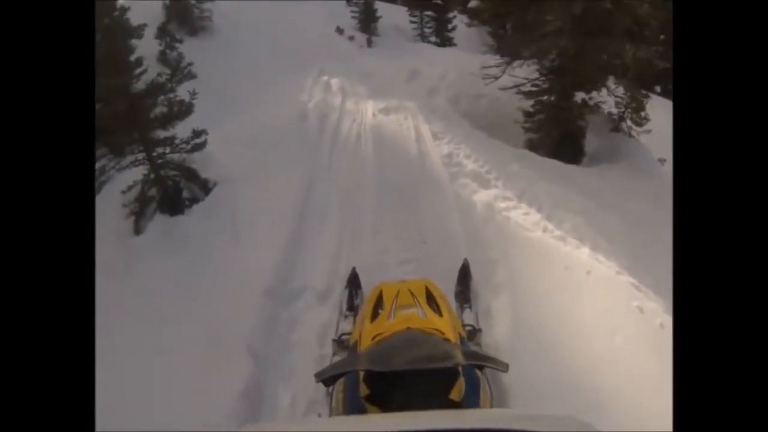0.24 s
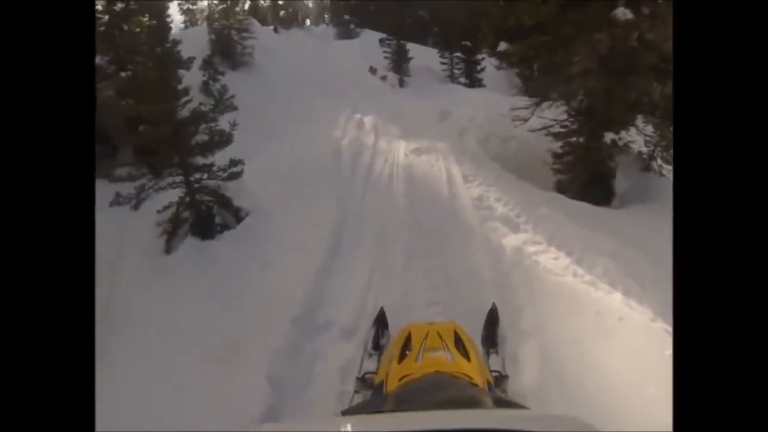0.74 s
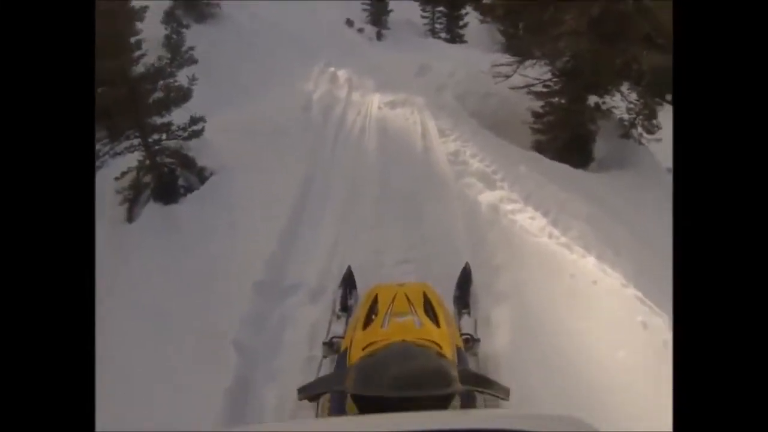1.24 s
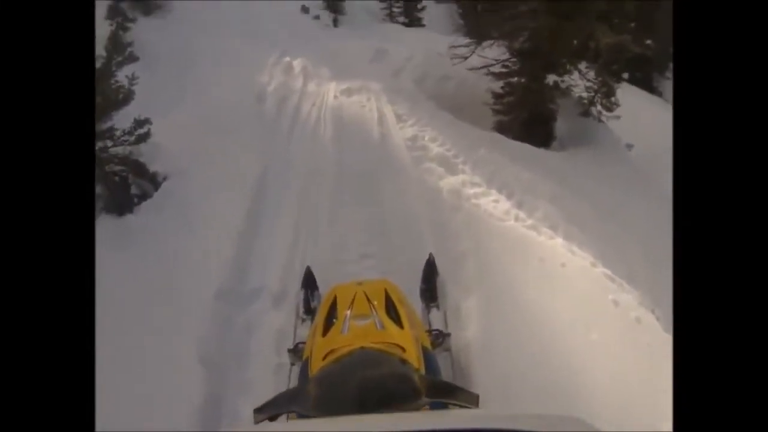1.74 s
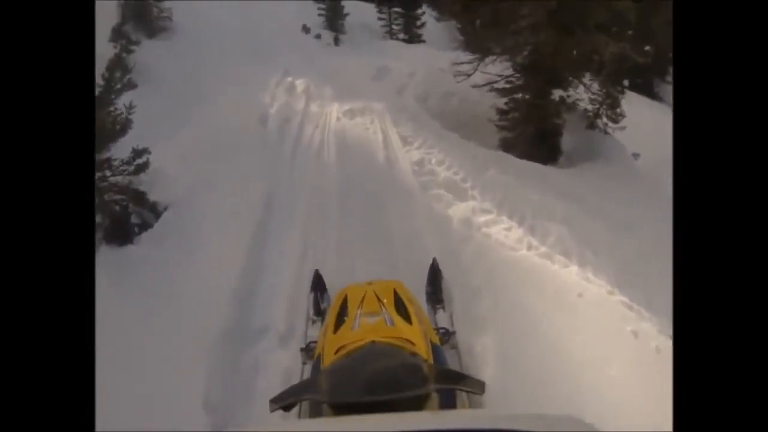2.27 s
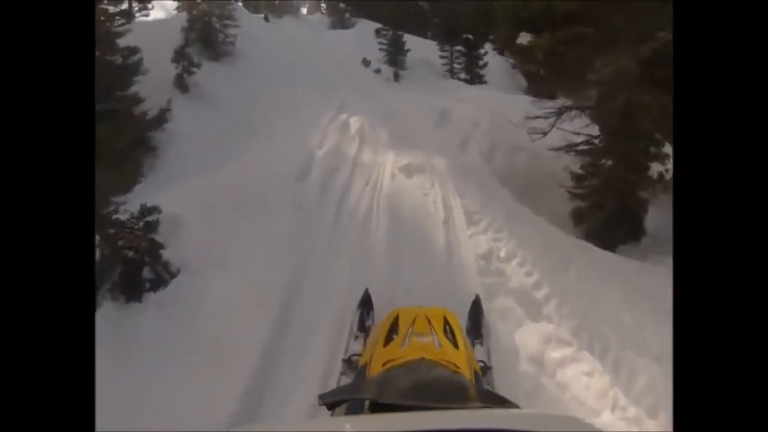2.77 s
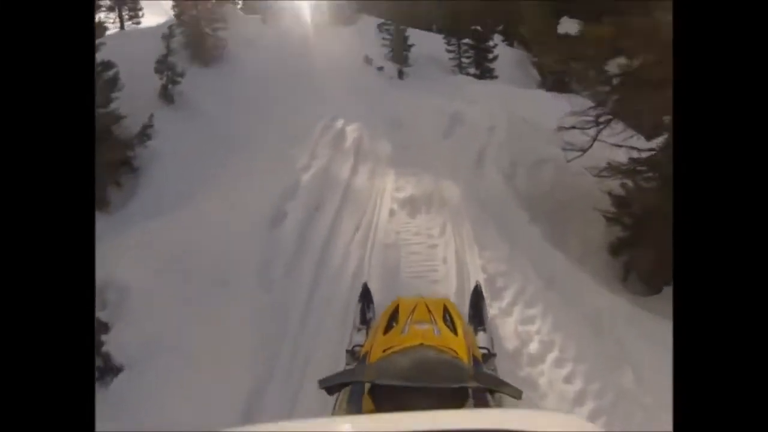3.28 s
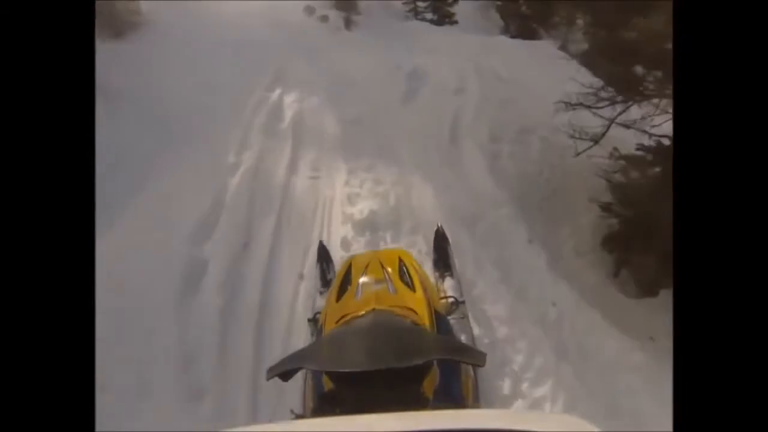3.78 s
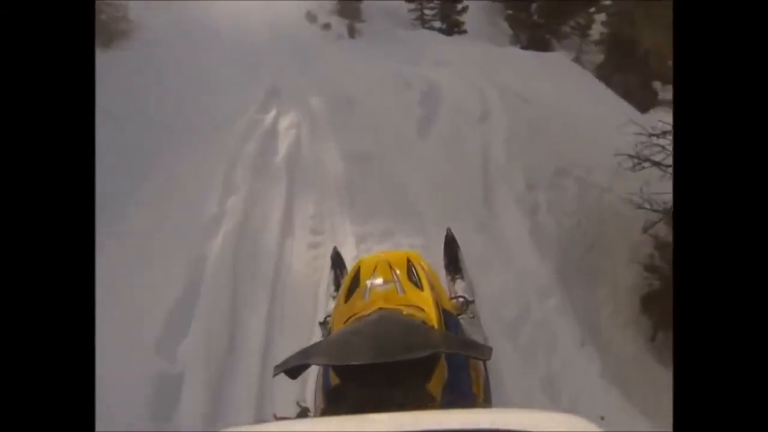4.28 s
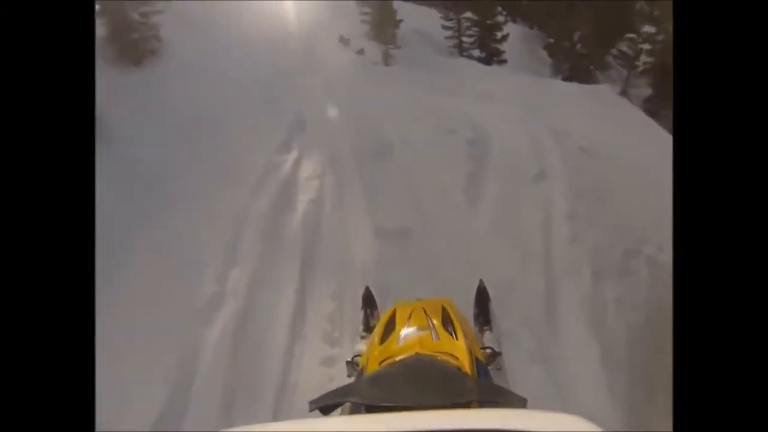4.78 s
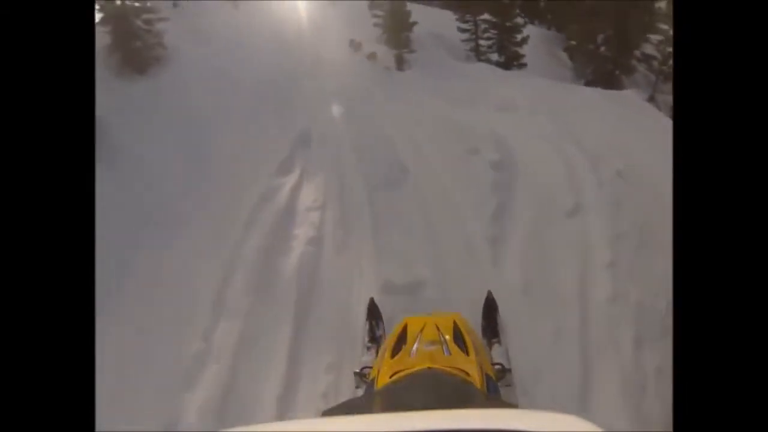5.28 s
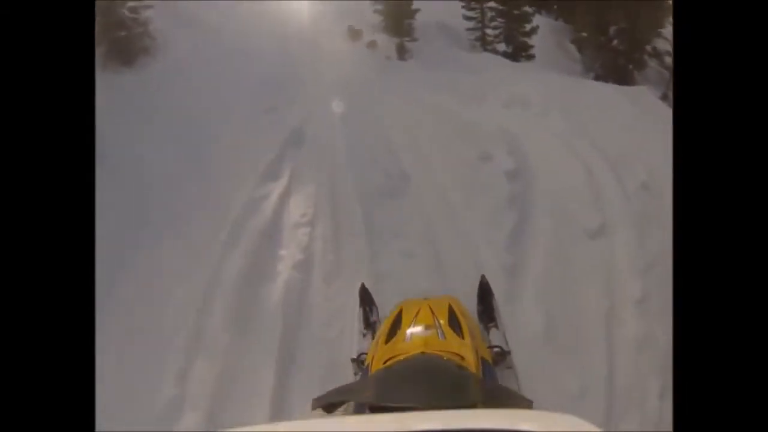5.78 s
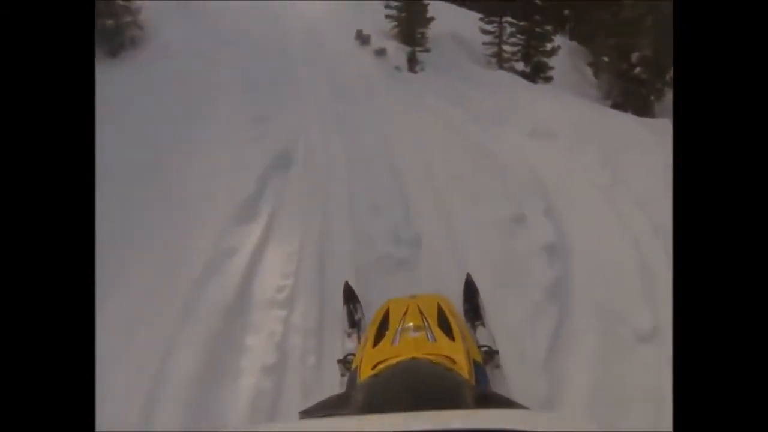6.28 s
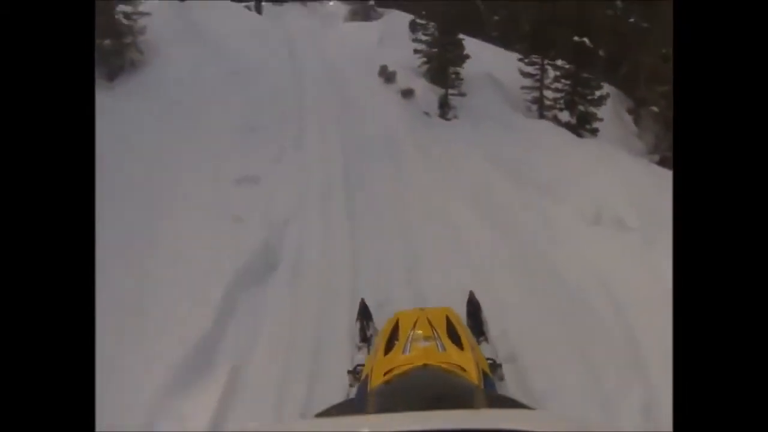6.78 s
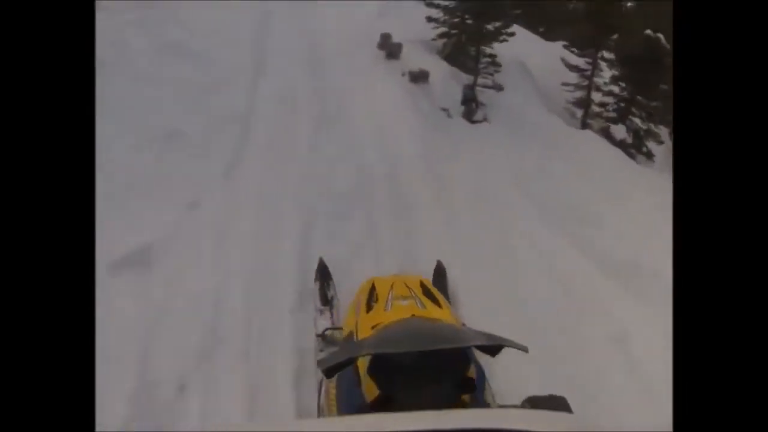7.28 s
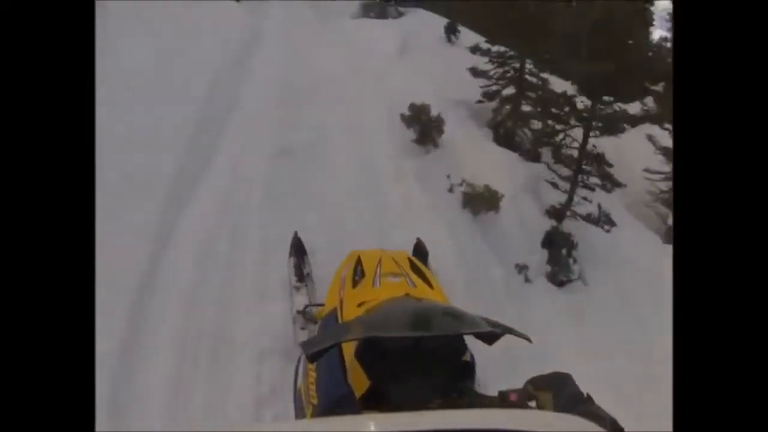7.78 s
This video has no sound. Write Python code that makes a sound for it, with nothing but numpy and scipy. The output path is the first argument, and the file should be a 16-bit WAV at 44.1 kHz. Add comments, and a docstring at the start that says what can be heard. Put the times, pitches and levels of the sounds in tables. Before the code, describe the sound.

A two-stroke snowmobile is heard very close, from the rider's position, on an open snowy slope without echo. From 0 to 1.5 seconds it idles low and lumpy beneath a soft fan hush, with brief cloth rustles. A sharp plastic click with a dull thud snaps at about 0.26, a softer knock comes at 0.45, and a quick metallic rattle at 0.62-0.67. At 1.5 the engine jumps up in two quick blips, then pulls in raspy bursts near 2.0, 2.4, 2.9, 3.4 and 4.0, sagging between them with stuttering misfires and low thumps. From 4.3 to 5.6 it holds a rough, sputtering drone. Throttle returns near 5.9, with a clear airbox howl around 6, then the pitch climbs steadily, reaching a loud, hard metallic buzz from 7.5 to the end at about 8, with track rumble and snow spray hiss.

```python
"""Snowmobile pulling away uphill

A two-stroke twin snowmobile, heard from the rider's helmet, idles while something on it is clicked and rattled.
It then pulls away up a snowy slope in bursts of throttle, misfires when the throttle closes, and winds up under load.
One train of firing pulses drives the exhaust, airbox and engine casing through filters, mixed with gas noise.
Shaped noise makes the fan, belt, track, snow spray and clothing; fading sine waves make the clicks and rattles.
"""
import sys
import numpy as np
from scipy import signal
from scipy.fft import rfft, irfft, next_fast_len
from scipy.io import wavfile
from scipy.ndimage import uniform_filter1d, map_coordinates

SR = 44100
rng = np.random.default_rng(int(sys.argv[2]) if len(sys.argv) > 2 else 0)


def generate_wav(signal):
    """Clip the signal to [-1, 1] and save it as 16-bit WAV at the path in sys.argv[1]."""
    frames = np.transpose(np.atleast_2d(signal))
    scaled = np.clip(frames, -1, 1) * 32767
    pcm = np.round(scaled).astype(np.int16)
    wavfile.write(sys.argv[1], SR, pcm)


N = 354108  # length in samples
FULL_HZ = 200  # the full firing rate, in firings a second


def amp(db):
    """Turn decibels into a gain."""
    return 10 ** (np.asarray(db) / 20)


def unit(x):
    """Scale x to an average (rms) level of 1."""
    return x / np.sqrt(np.mean(x ** 2) + 1e-20)


def steady(x, size=5000):
    """Hold x at rms 1 from moment to moment, keeping its fast flutter; size is in samples."""
    power = uniform_filter1d(uniform_filter1d(x ** 2, size), size)
    return x / np.sqrt(np.abs(power) + 1e-14)


def curves(rows, where=None):
    """Read every later column at places along the first column, by default at the time of every sample."""
    first, *columns = np.transpose(rows)
    if where is None:
        where = np.arange(N) / SR
    return [np.interp(where, first, column) for column in columns]


def wobble(rate):
    """Make a smooth random curve with rate random points a second."""
    positions = np.linspace(0, N * rate / SR, 4000)
    smooth = map_coordinates(rng.standard_normal(2000), [positions], mode="wrap")
    return np.interp(np.arange(N), np.linspace(0, N, 4000), smooth)


def swell(s, width):
    """Rise and fall in a bell shape: 1 at time s, about a third at width seconds either side."""
    return np.exp(-((np.arange(N) / SR - s) / width) ** 2)


def colour(x, points, size=16384):
    """Filter x to a (Hz, dB) shape, with a filter that never sounds ahead of its input."""
    hz, db = np.transpose(points)
    log_hz = np.log(np.fft.rfftfreq(size, 1 / SR) + 1)
    log_gain = np.log(amp(np.interp(log_hz, np.log(hz), db)))
    # folding the cepstrum moves all of the filter's response to after the input (minimum phase)
    cepstrum = irfft(log_gain)
    cepstrum[1:size // 2] *= 2
    cepstrum[size // 2 + 1:] = 0
    return signal.fftconvolve(x, irfft(np.exp(rfft(cepstrum))))[:N]


def filtered(x, response):
    """Multiply the spectrum of x by a function of frequency."""
    padded = next_fast_len(N + SR // 4)
    hz = np.fft.rfftfreq(padded, 1 / SR)
    return irfft(rfft(x, padded) * response(hz), padded)[:N]


def resonate(x, modes):
    """Pass x through (Hz, width Hz, dB) resonances whose skirts fall away quickly."""
    centre = np.mean([mode[0] for mode in modes])

    def response(f):
        peaks = 0
        for k, (hz, width, db) in enumerate(modes):
            # signs alternate from one resonance to the next
            peaks = peaks + (-1) ** k * amp(db) * 1j * f * width / (hz * hz - f * f + 1j * f * width)
        return peaks / (1 + ((f - centre) / (.4 * centre)) ** 4)

    return filtered(x, response)


def blend(tone, noise, tone_db):
    """Mix tone and noise in the given ratio, at rms 1."""
    return steady(amp(tone_db) * steady(tone) + steady(noise))


def pulses(times, sizes):
    """Make short impulses that may fall between samples, without false high tones."""
    at = times[:, None] * SR
    index = np.floor(at).astype(int) + np.arange(-7, 9)
    shape = np.sinc(index - at) * np.cos(np.pi * (index - at) / 16) ** 2
    index = np.clip(index, 0, N).ravel()
    return np.bincount(index, (shape * sizes[:, None]).ravel(), N + 1)[:N]


def crank():
    """Give firing rate and throttle: the engine winds up in each burst, sags in between, then climbs."""
    # Bursts of throttle. Each row: opens in seconds, closes in seconds, firing rate at opening in Hz,
    # firing rate at closing in Hz, throttle from 0 to 1.
    bursts = [(1.526, 1.689, 54.76, 94.2, 0.36), (1.776, 1.9, 102.2, 137.2, 0.41),
              (2.03, 2.255, 133.3, 165.6, 1), (2.355, 2.606, 148, 172.1, 0.99),
              (2.897, 3.173, 136.2, 158.6, .95), (3.416, 3.637, 134.3, 146.7, 0.9),
              (3.979, 4.279, 127.7, 144.6, 0.5)]
    # The long pull uphill. Each row: time in seconds, firing rate in Hz.
    climb = [(4.6, 134.1), (4.76, 132.9), (5.01, 131.9), (5.6, 134.2), (5.92, 146.1), (6.15, 152.1),
             (6.89, 177.7), (7.25, 185.2), (7.51, 199.9), (7.96, 201)]
    # The throttle lever during that pull. Each row: time in seconds, throttle from 0 to 1.
    lever = [(4.35, .2), (5.0, .3), (5.55, 0.3), (5.95, 0.78), (6.5, 0.78), (7.0, 0.5), (7.38, 0.5),
             (7.5, 0.74)]
    idle_hz = 52.7  # firings a second
    ease = .4  # how much a change of speed levels off towards its end
    throttle_s = 0.024  # travel time of the lever, in seconds
    t = np.arange(N) / SR
    turning = []
    for opens, closes, low, high, _ in bursts:
        turning += [(opens, low), (closes, high)]
    s, hz = np.transpose(turning + [climb[0]])
    step = np.interp(t, s, np.arange(len(s)))
    part = step % 1
    speed = np.interp(step + ease * part * (1 - part), np.arange(len(s)), hz)
    speed = np.where(t < s[-1], speed, curves(climb)[0])
    speed = np.where(t < s[0], idle_hz, speed)
    throttle = sum(amount * ((t > opens) & (t <= closes)) for opens, closes, _, _, amount in bursts)
    throttle = throttle + (t > bursts[-1][1]) * curves(lever)[0]
    return speed, np.clip(uniform_filter1d(throttle, int(throttle_s * SR)), 0, 1)


def clutch(speed):
    """Tell how firmly the clutch grips, 0-1: it starts to grip above idle speed."""
    return np.clip((speed - 55) / 60, 0, 1)


def surge(speed):
    """Tell how hard the engine winds up against the clutch, 0-1."""
    quick_rise = 260  # the wind-up that counts as quick, in Hz per second
    rise = uniform_filter1d(np.gradient(speed) * SR, SR // 12)
    return clutch(speed) * np.clip(rise / quick_rise, 0, 1)


def loudness(speed, throttle):
    """Set each layer's level in dB by engine speed, changed as the throttle shuts or the engine winds up."""
    # Loudness at each engine speed; the rasp swells towards 162 firings a second, then drops back.
    # Each row: firing rate in Hz, then levels in dB of boom, pipe, airbox, casing, rasp, belt and track.
    levels = [(51.7, -42, -71.5, -82, -75, -83.5, -65), (73.6, -38, -56, -66, -63.5, -73.5, -65),
              (137.3, -37.5, -48, -63, -56, -65, -67.5), (147.5, -36, -51, -59, -54.5, -63.5, -63),
              (162.5, -39.5, -53, -59.5, -51, -56.5, -58), (162.8, -39.5, -50.5, -58, -51.5, -60.5, -61),
              (192, -39, -59.5, -56, -51.5, -58.5, -58.5), (200.77, -33, -55.5, -59.5, -49, -57.5, -54.5)]
    # Change with the throttle shut, in dB: boom, pipe, airbox, casing, rasp, belt and track.
    shut_change = [-3, -4, -2.5, 1, -1, 12]
    # Change while the engine winds up quickly, in dB: the same six layers.
    surge_change = [1.06, 2, 1.5, -.5, 1.5, 1]
    shut = clutch(speed) * (1 - throttle)
    winding = surge(speed)
    rows = zip(curves(levels, speed), shut_change, surge_change)
    return [db + shut_db * shut + surge_db * winding for db, shut_db, surge_db in rows]


def firings(count, speed, throttle, catch=0.65, idle_scatter=.3, part_scatter=0.05, weak=.22):
    """Find time, strength and cylinder imbalance of every firing; a starved engine misfires."""
    # Stretches between bursts when every firing fails. Each row: from in seconds, to in seconds.
    cutouts = [(1.915, 1.975), (2.7, 2.73), (2.765, 2.812), (2.833, 2.877), (3.215, 3.241), (3.283, 3.328),
               (3.368, 3.411), (3.745, 3.775), (3.869, 3.893), (3.928, 3.977)]
    starved_below = .4  # throttle below which the engine misfires
    miss_share, unsteady_shut, open_scatter = .32, 0.45, .03  # share that fails and scatter, shut; scatter, open
    mismatch_from_hz, mismatch_per_hz = 170, 0.0022  # at high revs one cylinder fires harder
    times = np.interp(np.arange(int(count[-1]) + 1), count, np.arange(N) / SR)
    at = (times * SR).astype(int)
    grip = clutch(speed[at])
    starved = np.clip(1 - throttle[at] / starved_below, 0, 1)
    luck = rng.random(2000)[:len(times)]
    scatter = rng.standard_normal(2000)[:len(times)]
    alternate = (-1) ** np.arange(len(times))
    lean = mismatch_per_hz * np.maximum(speed[at] - mismatch_from_hz, 0) * alternate
    # spent gas builds up in a starved cylinder until a firing fails and clears it
    spent = np.cumsum(miss_share * grip * starved * (.5 + luck))
    failed = np.diff(np.floor(spent), prepend=0) > 0
    for start, end in cutouts:
        failed = failed | ((times > start) & (times < end))
    # unburnt charge makes the firing after a miss stronger
    sizes = np.where(failed, weak + throttle[at], 1 + catch * starved * np.roll(failed, 1))
    driven_scatter = part_scatter * (1 - throttle[at]) + unsteady_shut * starved
    unsteady = open_scatter + idle_scatter * (1 - grip) + grip * driven_scatter
    return times, sizes * (1 + lean + unsteady * scatter), lean


def gas(cycles):
    """Make turbulent gas noise that surges once in every cycle."""
    return unit(rng.standard_normal(N) * np.exp(0.12 * np.cos(2 * np.pi * cycles)))


def hood(x, t60=.03):
    """Smear each knock with dense, short echoes under the hood, which favour some harmonics over others."""
    t = np.arange(SR // 20) / SR
    return signal.fftconvolve(x, rng.standard_normal(len(t)) * amp(-60 * t / t60))[:N]


def engine(speed, throttle, pumping=0.88, thump_db=-12, flow_mismatch=1.7, casing_mismatch=8, hunting=0.02967,
           pipe_tone_db=13, airbox_tone_db=2.0, casing_tone_db=-1, rasp_tone_db=1):
    """Drive exhaust, airbox and engine casing with one train of firings."""
    # Filter shapes of the exhaust's deep boom, its pipe and its rasp. Each row: frequency in Hz, level in dB.
    boom_shape, pipe_shape, rasp_shape = [(12, -54.5), (28, -15.5), (50, -5), (80, -10.5), (105, -1),
                                          (140, -1), (165, 5), (198, -5), (220, -20.5), (300, -21.5),
                                          (500, -91)], [(150, -69.5), (215, -2.5), (270, 7), (340, -3.5),
                                                        (400, 5), (480, 0.5), (530, -10.5), (580, 3),
                                                        (680, -19.5), (800, -40.5), (1400, -71.5)], [(1200, -56), (2000, -21.5), (2200, 3),
                                                                      (2600, -3), (3100, -8.5),
                                                                      (3550, -19.5), (3800, -17),
                                                                      (4550, -15.5), (5200, -21.5),
                                                                      (6300, -19), (8000, -32),
                                                                      (11000, -38.5), (14000, -63.5)]
    # Shape of the low thump from the gap that a misfire leaves in the gas flow. Each row: frequency in Hz, level in dB.
    thump_shape = [(10, -44), (28, -14), (46, 1), (70, 3.5), (95, -7), (125, -49.5), (250, -94.5)]
    # Resonances of the airbox, the cowl and the engine casing. Each row: frequency in Hz, width in Hz, level in dB.
    airbox_modes, cowl_modes, casing_modes = [(870.5, 38, 1), (1030, 50, -6), (1096, 75, -5.5),
                                              (1244, 6.3, 1.5)], [(834, 81, -10), (1122, 60, 0.5)], [(1458.5, 91, -5),
                                                                            (1593, 85, -4), (1805, 57, 2.5),
                                                                            (1899, 34, 2.5), (2017, 87, -8)]
    # The hard edge of the rasp while the pipe is in tune. Each row: frequency in Hz, width in Hz, level in dB.
    edge_modes = [(3020, 430, 0)]
    edge_db = -10  # level of the edge over the rasp
    tuned_hz, tuned_width_hz = 162.1, 9.7  # the firing rates at which the pipe is in tune
    snarl_idle_db, snarl_shut_db, snarl_open_db = -7.5, -3, 1  # firing tone over gas noise
    buzz_full_db, buzz_db_per_hz = -47, 2.6  # buzz at the full firing rate, and its fall below that
    howl_db, howl_clean_db, howl_pipe_db, sing_db = 10.5, 12.5, -12.5, 3.5
    boom_db, pipe_db, airbox_db, casing_db, rasp_db, _ = loudness(speed, throttle)
    # during the climb the airbox howls on a clean note and the pipe gives way; then the casing sings
    howl = swell(6.023, 0.26)
    sing = swell(6.4, 0.25)

    # the crank hunts at idle and runs evenly once the clutch grips
    drive = clutch(speed)
    uneven = (.0012 + hunting * (1 - drive)) * wobble(30)
    count = np.cumsum(speed * (1 + uneven)) / SR  # firings so far
    # an open throttle makes sharp, regular firings
    driven_snarl_db = (1 - throttle) * snarl_shut_db + throttle * snarl_open_db
    snarl_db = (1 - drive) * snarl_idle_db + drive * driven_snarl_db
    times, sizes, lean = firings(count, speed, throttle)

    blasts = pulses(times, sizes)
    boom = steady(colour(blasts, boom_shape), size=6000)
    thump = drive * unit(colour(blasts, thump_shape))

    # the pistons pump gas even when the charge does not burn
    flow = pulses(times, (sizes + pumping) * (1 + flow_mismatch * lean))
    pipe = blend(colour(flow, pipe_shape), colour(gas(count), pipe_shape), snarl_db + pipe_tone_db)
    airbox_ratio_db = 1.7 * snarl_db + airbox_tone_db + howl_clean_db * howl
    airbox = blend(resonate(flow, airbox_modes), resonate(gas(count), cowl_modes), airbox_ratio_db)

    # the casing is knocked unevenly, harder by one cylinder at high revs
    scatter = .12 * rng.standard_normal(2000)[:len(times)]
    knocks = pulses(times, (sizes + pumping) * (1 + casing_mismatch * lean + scatter))
    casing_ratio_db = 1.2 * snarl_db + casing_tone_db
    # the noise here surges once every two firings
    casing = blend(resonate(knocks, casing_modes), resonate(gas(count / 2), casing_modes), casing_ratio_db)
    # near full revs the firings hit the casing's two main resonances, which buzz
    main_modes = casing_modes[2:4]
    buzz = blend(resonate(knocks, main_modes), resonate(gas(count / 2), main_modes), snarl_db)
    buzz_db = buzz_full_db + buzz_db_per_hz * np.minimum(speed - FULL_HZ, 0)

    # the highest firing harmonics dissolve into hiss
    soft_knocks = hood(filtered(knocks, lambda hz: (hz / 3100) / (1 + (hz / 3100) ** 10)))
    rasp_ratio_db = snarl_db + rasp_tone_db
    rasp = blend(colour(soft_knocks, rasp_shape), colour(gas(count), rasp_shape), rasp_ratio_db)
    in_tune = np.exp(-((speed - tuned_hz) / tuned_width_hz) ** 2)
    edge = blend(resonate(soft_knocks, edge_modes), resonate(gas(count), edge_modes), rasp_ratio_db)
    rasp = rasp + amp(edge_db) * in_tune * edge

    out = amp(boom_db) * (boom + amp(thump_db) * thump)
    out = out + amp(pipe_db + howl_pipe_db * howl) * pipe
    out = out + amp(airbox_db + howl_db * howl) * airbox
    out = out + amp(casing_db + sing_db * sing) * casing
    return out + amp(buzz_db) * buzz + amp(rasp_db) * rasp


def fan(level_db=-74):
    """Blow cooling air through the cowl: a steady hush of shaped noise."""
    # Colour of the fan's hush. Each row: frequency in Hz, level in dB.
    hush = [(200, -10.5), (450, -4.5), (700, -4.5), (1110, 1), (1400, -9), (1900, -9), (2500, -10.5),
            (3500, -27.5), (8000, -41.5)]
    return amp(level_db) * unit(colour(rng.standard_normal(N), hush))


def track(speed, throttle):
    """Rumble the belt and track and throw snow: noise whose level follows engine speed and throttle."""
    # Colour of belt and track in the snow. Each row: frequency in Hz, level in dB.
    rumble_shape = [(20, -16), (45, -6), (100, -3), (250, -8.5), (450, -18), (700, -27.5), (3000, -70)]
    # Colour of the snow thrown off the track. Each row: frequency in Hz, level in dB.
    spray_shape = [(2500, -31.5), (3700, 7.5), (4600, 0.5), (6500, -8), (8500, -16), (11000, -14.5),
                   (14000, -32.5)]
    rumble_db = loudness(speed, throttle)[-1] + 1.8 * wobble(9)
    rumble = amp(rumble_db) * unit(colour(rng.standard_normal(N), rumble_shape))
    spray_db = -72.5 + 0.9 * (speed - FULL_HZ)  # falls 0.9 dB for each Hz below the full firing rate
    spray = amp(spray_db) * unit(colour(rng.standard_normal(N), spray_shape))
    return rumble + spray


def rustle():
    """Brush clothing as the rider shifts before setting off: soft swells of fluttering noise."""
    # Clothing brushes. Each row: middle in seconds, half length in seconds, level in dB.
    brushes = [(.01, 0.018, -55), (0.246, .04, -55.5), (.34, .03, -56.5), (0.466, 0.0088, -60.5),
               (0.638, 0.026, -56)]
    level = sum(amp(db) * swell(s, width) for s, width, db in brushes)
    # colour of the cloth: frequency in Hz, level in dB
    cloth = [(150, -16.0), (420, 15.0), (900, -2.5), (2000, -6.0), (4000, -22), (7000, -27.0), (10000, -32.0)]
    return level * amp(3 * wobble(45)) * unit(colour(rng.standard_normal(N), cloth))


def ring(modes, t, vary_db):
    """Strike a part so its modes ring and fade, peaking at 1, with strengths varied by vary_db at each blow."""
    wave = 0
    for hz, db, t60 in modes:
        fade = amp(db + vary_db * rng.standard_normal() - 60 * t / t60)
        wave = wave + fade * np.sin(2 * np.pi * (hz * t + rng.random()))
    wave = wave * (1 - np.exp(-t / 0.00061))  # soften the first instant
    return wave / np.abs(wave).max()


def clicks(thud_hz=112, thud_t60=0.11, crack_db=-19, crack_t60=0.011):
    """Snap plastic with a dull thud while a small metal part rattles; t60 is a 60 dB fade in seconds."""
    # Contacts on the machine. Each row: start in seconds, click in dB, thud in dB, rattle in dB.
    contacts = [(0.185, -43.5, -35, -66), (0.2574, -21, -36, -56), (0.2603, -50, -47, -57),
                (0.268, -45, -25, -41.5), (.452, -48, -34, -73), (0.618, -47, -58, -50),
                (0.629, -42, -45, -61), (0.639, -60, -39, -46), (0.649, -48, -55, -44),
                (.654, -43, -58, -40), (0.6573, -51, -62, -36), (0.6639, -45.5, -46, -39.5)]
    # Ringing modes of the plastic and the metal part. Each row: frequency in Hz, level in dB, 60 dB fade in seconds.
    plastic, metal = [(471, -6.5, 0.083), (560, -9, 0.026), (752, -8, 0.051), (834, -12, 0.079),
                      (1066, -20.5, 0.057), (1660, 4, 0.012), (1740, -34, 0.013), (1796, 0, 0.019),
                      (2150, -16, 0.025), (3030, -24, 0.035), (3740, -29, 0.042), (6510, -32, 0.028)], [(946, -5.5, 0.07), (1130, -4.5, 0.041), (1260, -14, 0.043),
                                       (1967, 0, 0.038), (1980, -2, 0.061), (2380, -2, 0.026),
                                       (4400, -18, 0.023), (6200, -21, 0.031)]
    out, t = np.zeros(N), np.arange(SR // 5) / SR
    b, a = signal.butter(4, 6500, fs=SR)
    for s, click_db, thud_db, rattle_db in contacts:
        crack = signal.lfilter(b, a, rng.standard_normal(len(t))) * amp(crack_db - 60 * t / crack_t60)
        thud = np.sin(2 * np.pi * thud_hz * t) * amp(-60 * t / thud_t60)
        blow = amp(click_db) * (ring(plastic, t, 0) + crack)
        blow = blow + amp(thud_db) * thud + amp(rattle_db) * ring(metal, t, 3.5)
        out[round(s * SR):][:len(t)] += blow
    return out


def scene():
    """Add up the sources, all close to the one microphone; snow returns no echo."""
    speed, throttle = crank()
    mix = engine(speed, throttle) + track(speed, throttle) + fan() + clicks() + rustle()
    return mix[None]


def record(dry):
    """Add the camera's own hiss and whine and keep nothing above its band limit."""
    # Faint electronic whine. Each row: frequency in Hz, level in dB.
    whine_tones = [(8446, -98), (11289, -103), (12672, -102)]
    # Colour of the hiss. Each row: frequency in Hz, level in dB.
    hiss_shape = [(100, -10.5), (3000, -2.5), (8000, -6), (12600, -3), (13100, -38.5), (15400, -13)]
    top_hz = 15400
    t = np.arange(N) / SR
    # the root of 2 makes each level an rms level
    whine = sum(np.sqrt(2) * amp(db) * np.sin(2 * np.pi * hz * t) for hz, db in whine_tones)
    hiss = amp(-84.5) * unit(colour(rng.standard_normal(N), hiss_shape))
    return filtered(dry[0] + whine + hiss, lambda hz: hz < top_hz)[None]


dry = scene()
out = record(dry)
generate_wav(out)
```